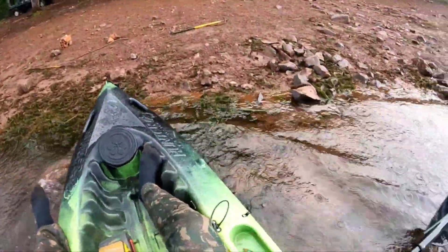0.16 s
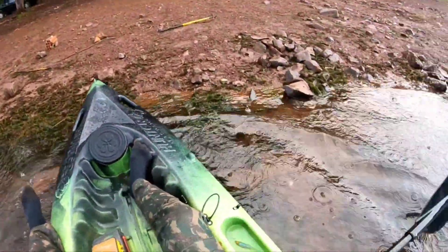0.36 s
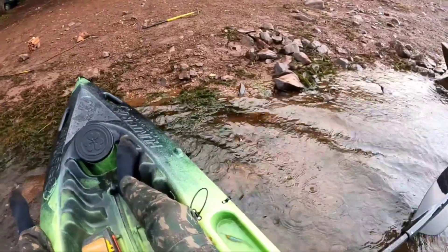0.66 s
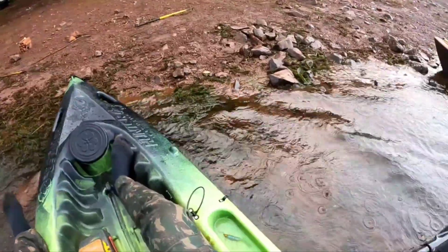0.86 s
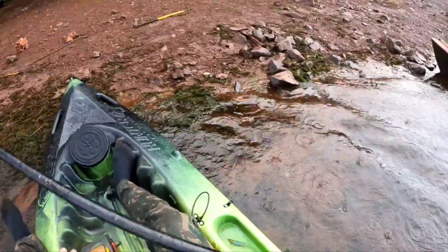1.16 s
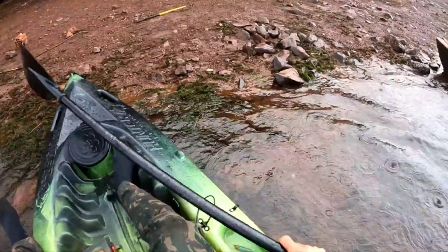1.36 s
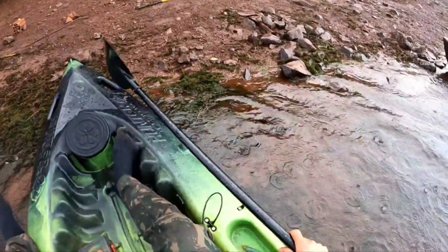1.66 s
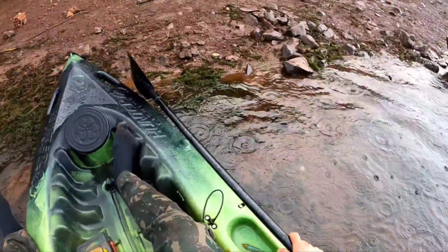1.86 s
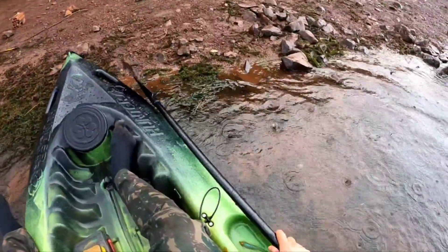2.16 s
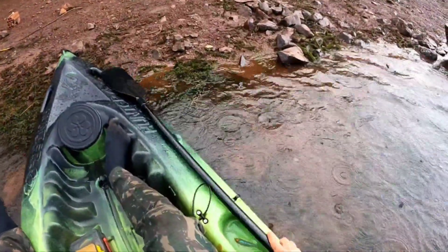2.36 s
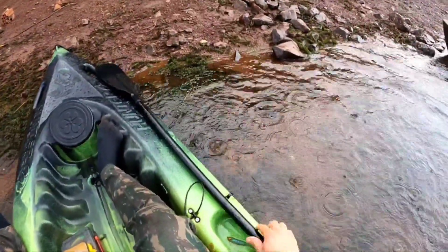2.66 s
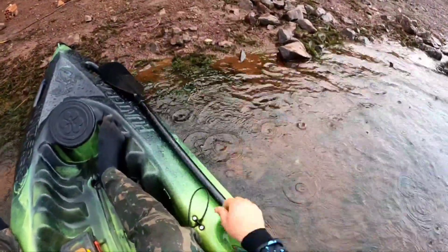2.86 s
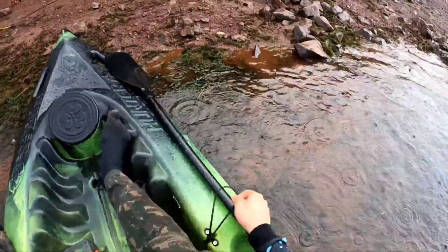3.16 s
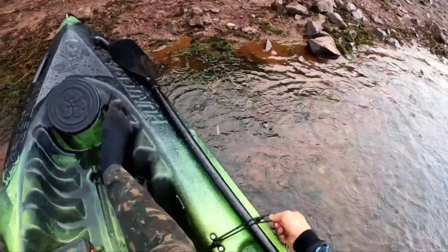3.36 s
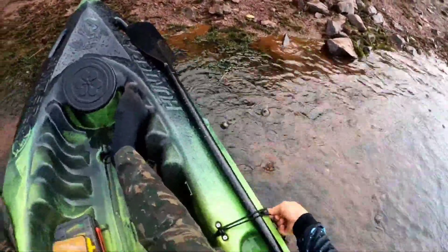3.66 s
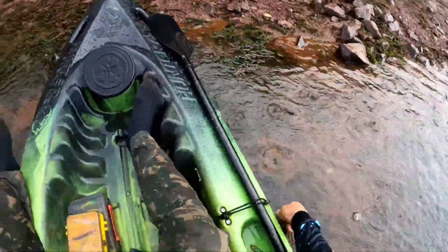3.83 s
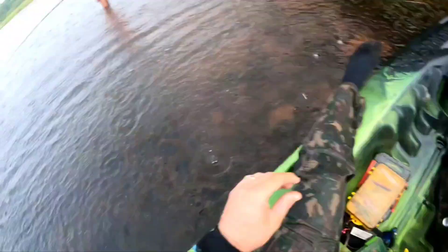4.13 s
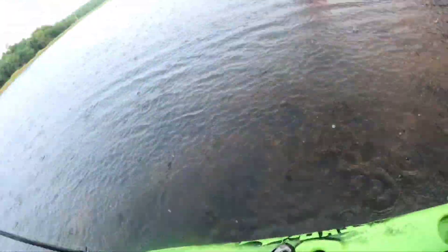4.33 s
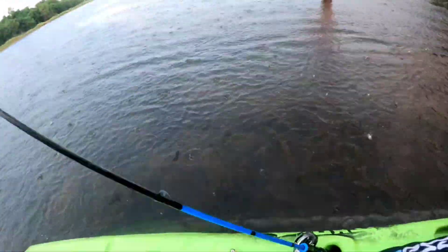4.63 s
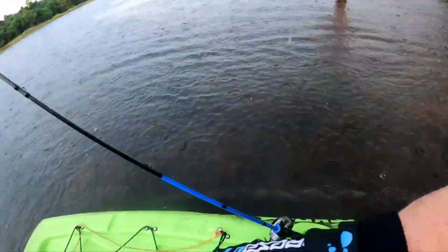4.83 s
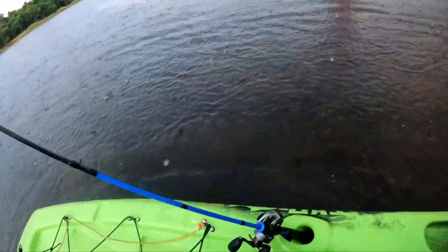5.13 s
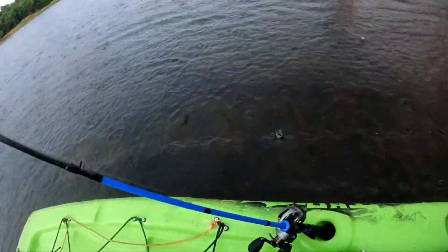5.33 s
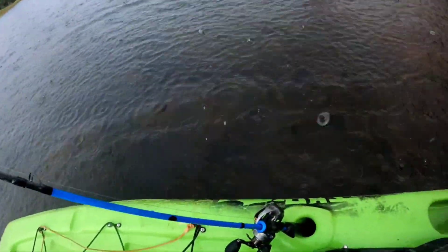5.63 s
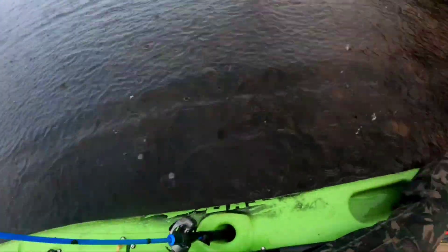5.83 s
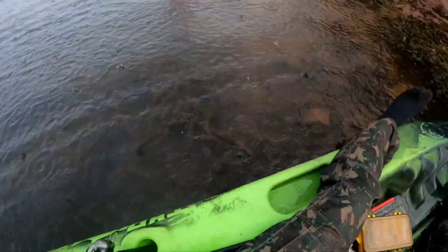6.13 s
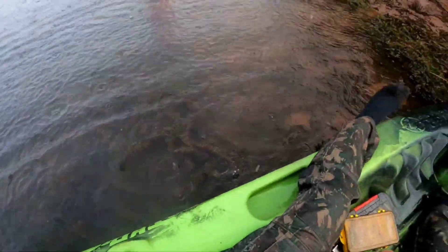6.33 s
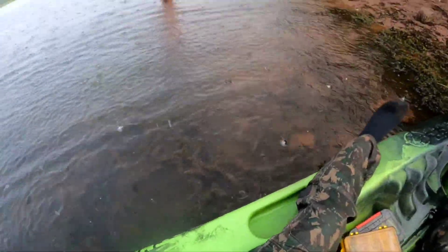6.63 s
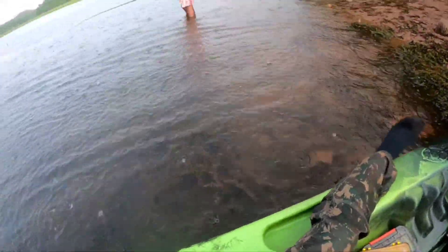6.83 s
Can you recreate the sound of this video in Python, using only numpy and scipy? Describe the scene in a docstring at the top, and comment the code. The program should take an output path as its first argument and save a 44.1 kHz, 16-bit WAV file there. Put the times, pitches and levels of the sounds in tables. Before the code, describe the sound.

Worn microphone, close and outdoors: a plastic kayak grinds and rumbles in short lurches on mud while light rain patters. A paddle taps, then clatters down in a tight cluster of hollow knocks. After a quieter spell a metal hook snaps brightly, water gurgles along the side, a few small knocks follow, and the hull ends with deep dull bumps and scrapes, leaning to the right.

```python
"""At a muddy bank in light rain, someone with a camera strapped to them settles into a plastic kayak.
Slips on mud and gravel excite the hull's modes as decaying sines; a paddle's knocks add cracks and thumps.
A metal hook pings with beating modes; bubbles, gurgles and low bumps of the hull are short, nearly steady
tones, and water swills in crowds of such tones.
Far rain is shaped noise, near drops on water, hull and clothes are short plips and bursts of noise."""
import sys
import numpy as np
from scipy import signal
from scipy.fft import rfft, irfft
from scipy.io import wavfile
from scipy.ndimage import uniform_filter1d

SR = 44100
rng = np.random.default_rng(int(sys.argv[2]) if len(sys.argv) > 2 else 0)


def digitize_waveform(pressure):
    """Quantize a signal to 16-bit integers and store it at the path in sys.argv[1].

    Rows of a 2-D input are taken as channels; values are limited to [-1, 1].
    """
    field = np.atleast_2d(pressure).T
    bounded = np.clip(field, -1, 1)
    quanta = np.round(bounded * 32767).astype(np.int16)
    wavfile.write(sys.argv[1], SR, quanta)


N = 308259

# Blows on the hull: t/s, peak level/dB, thump relative level/dB, thump pitch f/Hz,
# pitch favoured by the spot f/Hz, crack relative level/dB
BLOWS = [(0.633, -20, -15.5, 87.5, 306, -9.5), (0.681, -20.5, 0, 64.6, 301, -8),
         (1.154, -29, -20.5, 199, 433, -5), (1.692, -16.5, -17.5, 75.4, 483, -11.5),
         (2.178, -5, -10, 126, 680, -27), (2.3, -12, -30.5, 110, 655, -23),
         (2.401, -8.5, -7.5, 116, 680, -11.5), (2.461, -13.5, -7, 109, 505, -12.5),
         (2.478, -13.5, -26, 56.5, 504, -14), (2.498, -17.5, -16, 67.3, 415, -11),
         (2.581, -16, 12, 197, 490, 2.5), (2.584, -8.5, 4, 201, 330, -13),
         (2.629, -14.5, -11, 80.7, 345, -14), (2.663, -21.5, 2.5, 170, 1490, -2.5),
         (2.684, -13.5, -2.5, 56.5, 350, -16.5), (3.963, -20, 9.5, 118, 345, -3),
         (5.057, -22, -30, 129, 440, -12), (5.07, -26, -12, 86.1, 680, -29),
         (5.233, -18.5, -8, 56.5, 550, -15), (5.245, -24, 3, 116, 450, -2.5)]
# Modes of the hull, low to high: f/Hz, level/dB, decay time t60/s
HULL_MODES = [(63.5, 9, 0.0855), (83.4, 4, 0.196), (109.5, -2, 0.18), (159.4, 8.5, 0.089),
              (201.7, 3, 0.055), (249.4, 6, 0.06), (288, -4.5, 0.063), (351, 6.5, 0.064), (414, -3.5, 0.11),
              (512, 2.5, 0.07), (568, 6, 0.039), (690, 6.5, 0.038), (781, 3.5, 0.036), (946.7, 2.5, 0.0468),
              (1072, 6.5, 0.0247), (1263, 4.5, 0.01), (1446, -7, 0.035), (1804, 7.5, 0.01226),
              (2410, -3, 0.014)]
# Spectrum of the rain: f/Hz, relative spectral level/dB per Hz
RAIN_SPECTRUM = [(18, -34), (30, -1), (64, 1.5), (131, -8.5), (233, -4), (822, -9), (937, -5),
                 (3980, -13.5), (5040, -14.5), (7470, -18), (8740, -29), (9970, -24.5), (14800, -43),
                 (16000, -35)]

LEFT_RIGHT = np.array([[1], [-1]])  # opposite signs for the two sides


def amp(db):
    """Level definition: a gain is 10 to the power dB/20."""
    return 10 ** (np.asarray(db) / 20)


def evened(x):
    """Power normalisation: scales to rms 1."""
    return x / np.sqrt(np.mean(x ** 2) + 1e-20)


def peaked(x):
    """Peak normalisation: scales to peak 1."""
    return x / (abs(x).max() + 1e-20)


def read(points, hz):
    """Logarithmic interpolation: reads a spectrum on a log-frequency axis."""
    f, value = np.transpose(points)
    return np.interp(np.log(hz + 1), np.log(f + 1), value)


def curves(rows):
    """Linear interpolation in time: one value per sample for each column."""
    s, *columns = np.transpose(rows)
    return [np.interp(np.arange(N) / SR, s, c) for c in columns]


def add(mix, s, sound):
    """Superposition: adds a sound to the mix at time s."""
    part = mix[round(s * SR):][:len(sound)]
    part += sound[:len(part)]


def ring(modes, t, extra_db=0., turns=0., rise_cycles=0.11):
    """Modal synthesis: a sum of exponentially dying sines, each swelling over part of a cycle or more."""
    hz, db, t60 = np.transpose(modes)[:, :, None]
    swell = 1 - np.exp(-t * hz / rise_cycles)
    decay = amp(db + extra_db - 60 * t / t60)
    return (decay * swell * np.sin(2 * np.pi * (hz * t + turns))).sum(0)


def plip(hz, cycles, glide):
    """Damped oscillation: a few cycles that start quickly, rise in pitch as far as the glide says, and die."""
    u = np.arange(0, 4, hz / SR / max(cycles, .5))  # time in units of the given cycles
    envelope = u ** 1.15 * np.exp(-2.5 * u)
    phase = 2 * np.pi * cycles * u * (1 + glide * np.minimum(u, 2))
    return peaked(envelope * np.sin(phase))


def snap(noise, low_hz, high_hz, decay_s):
    """Band-limited impulse noise: an exponentially dying burst, filtered twice to one band."""
    t = np.arange(noise.shape[-1]) / SR
    band = signal.butter(2, [low_hz, high_hz], "band", fs=SR, output="sos")
    return peaked(signal.sosfilt(np.vstack([band, band]), noise * np.exp(-t / decay_s)))


def train(per_s, spread_db):
    """Shot noise: sparse clicks at random times with random sign, a few of them large."""
    place, size, sign = rng.random((int(per_s * N / SR), 3)).T
    size_db = spread_db * np.minimum(-np.log(size + 1e-9), 5)
    return np.bincount((place * N).astype(int), amp(size_db) * np.sign(sign - .5), N)


def steadied(x, span_s, share):
    """Automatic gain control: running power evens out part of the slow level swings, as a steady push does."""
    power = uniform_filter1d(evened(x) ** 2, size=int(span_s * SR))
    return evened(x / (abs(power) + 0.076) ** (share / 2))


def rain():
    """Diffuse field: far drops merge into partly coherent noise with drifting patches and a quick shared flicker."""
    # Likeness of left and right: f/Hz, coherence (1)
    likeness = [(60, 0.59), (180, 0.85), (550, 0.97), (1650, 0.8), (4970, 0.81), (15000, 0.43)]
    frames, hz = N // 128 + 5, np.fft.rfftfreq(512, 1 / SR)
    a, b, c, d, patches = rng.standard_normal((frames, 257, 5)).T
    flicker = evened(uniform_filter1d(patches, 60, axis=0))  # alike over wide bands, new in every frame
    patches = uniform_filter1d(patches, 6, axis=0)
    patches = evened(uniform_filter1d(patches, 20, axis=1))
    same = np.clip(read(likeness, hz), -1, 1)[:, None]
    left, independent = a + 1j * b, c + 1j * d
    z = np.array([left, same * left + np.sqrt(1 - same ** 2) * independent])
    z *= amp(read(RAIN_SPECTRUM, hz)[:, None] + 1.33 * patches + 2.84 * flicker)
    noise = signal.istft(z, nperseg=512, noverlap=384)[1][:, :N]
    return amp(-46) * evened(noise)


def patter(level_db, low_hz, high_hz, per_s, cycles, count=12):
    """Shot noise of near drops: random plips of many sizes, each size with its own level difference between sides."""
    out = np.zeros((2, N))
    for hz, side in zip(np.geomspace(low_hz, high_hz, count), rng.uniform(-0.042, 1, count)):
        drops = signal.oaconvolve(train(per_s / count, 3.28), plip(hz, cycles, 0.079))[:N]
        band_db = read(RAIN_SPECTRUM, hz) + 10 * np.log10(hz)  # bands widen with pitch
        out += drops * amp(band_db + 8.2 * side * LEFT_RIGHT)
    return amp(level_db) * evened(out)


def motion():
    """Addition of powers: shifts that swell, hold and fade, rocking after blows and rest set the grinding's gains."""
    # Shifts of weight: start t/s, hold t/s, rumble level/dB, scrape relative level/dB, favoured pitch f/Hz
    shifts = [(0.0, 0.12, -39.5, -29, 201), (0.208, .11, -35.5, 1.5, 262.6), (0.427, 0.13, -40, 5, 256.4),
              (0.598, 0.15, -31.5, 4.5, 229.5), (0.831, 0.082, -37.5, 3.5, 216.7),
              (1.15, 0.11, -50, 5, 222), (1.411, .16, -47, -10, 306), (1.652, 0.065, -36.5, 1, 255),
              (1.782, 0.076, -43, -18, 170), (2.73, 0.076, -34.5, -27, 160), (2.93, 0.27, -48, -10, 282.6),
              (3.301, 0.039, -43.5, 3, 247), (3.44, 0.13, -47.5, -8, 230), (3.877, 0.064, -44, 5, 175),
              (4.03, 0.094, -48.5, 0, 162), (4.32, 0.11, -60, 13.5, 424), (4.595, 0.27, -46, -4.5, 267),
              (4.896, 0.216, -32, -9.5, 214), (5.246, 0.027, -28.5, -13, 165), (5.58, 0.021, -37, -8, 165),
              (5.783, 0.034, -40.5, -2, 212), (5.9, 0.117, -37.5, -15, 160), (6.098, 0.13, -23.5, -7, 168),
              (6.51, 0.22, -30.5, -10.5, 165), (6.821, 0.036, -27.5, -5.5, 155.3),
              (6.96, .04, -36, -22, 160)]
    rise_db_per_s, fall_db_per_s = 267, 198
    still_db, still_hz = -62.5, 290  # the hull at rest
    after_db, after_scrape_db, after_hz, after_fall_db_per_s = -14, -4.5, 214, 161  # rocking left by a blow
    t = np.arange(0, N + 64, 64) / SR
    s, hold, db, scrape_db, hz = np.transpose(shifts)[:, :, None]
    shift_db = db - rise_db_per_s * np.maximum(s - t, 0) - fall_db_per_s * np.maximum(t - s - hold, 0)
    s, db, thump_db = np.transpose(BLOWS)[:3, :, None]
    rocking_db = db + np.maximum(thump_db, 0) + after_db - after_fall_db_per_s * abs(t - s)
    shift = amp(shift_db) ** 2
    after = (amp(rocking_db) ** 2 * (t > s + .012)).sum(0)
    still = amp(still_db) ** 2
    scraped, shaken = shift * amp(scrape_db) ** 2, after * amp(after_scrape_db) ** 2
    scrape = scraped.sum(0) + shaken + still
    # the pitch is the mean of all pitches, weighted by power
    pitch = ((scraped * hz).sum(0) + shaken * after_hz + still * still_hz) / scrape
    gains = np.sqrt(shift.sum(0) + after + still), np.sqrt(scrape), pitch
    return [np.interp(np.arange(N) / SR, t, uniform_filter1d(g, size=9)) for g in gains]


def grind():
    """Stick-slip excitation: slow lurches on mud and gravel ring low hull modes, quick slips higher ones and slosh."""
    rumble_gain, scrape_gain, favoured_hz = motion()
    t = np.arange(SR // 4) / SR
    sway_band = signal.butter(2, [28, 60], "band", fs=SR, output="sos")
    sway = signal.sosfilt(sway_band, train(300, 3.3))
    # the slope in dB/s damps the modes beyond their own decay
    lurch = signal.oaconvolve(train(90, 4.2), ring(HULL_MODES[:3], t, -120 * t, rise_cycles=0.38))[:N]
    slips, scrape = train(420, 3.0), 0
    for mode in HULL_MODES[3:10]:  # the contact wanders along the hull and favours the modes near it
        share = amp(-18.0 * np.log2(mode[0] / favoured_hz) ** 2)
        rung = signal.oaconvolve(slips, ring([mode], t, -90 * t, rise_cycles=0.39))[:N]
        scrape += share * evened(rung)
    # water along the side
    slosh = signal.oaconvolve(train(450, 3.0), ring(HULL_MODES[9:17], t, -300 * t))[:N]
    slosh_gain = amp(-14 + 7.0 * np.log2(favoured_hz / 250))
    low = steadied(evened(lurch) + .5 * evened(sway), 0.0775, 0.36)
    high = steadied(scrape, 0.086, 0.23) + slosh_gain * steadied(slosh, 0.092, 0.057)
    return rumble_gain * low + scrape_gain * high


def taps():
    """Impact and resonance: a pitched plip with a noisy click; the finest spray reaches each port differently."""
    # Big drops and small taps nearby: t/s, peak level/dB, pitch f/Hz, click relative level/dB,
    # spray relative level/dB
    tap_rows = [(0.095, -36, 500, -26, -29), (0.432, -42, 1050, 12, 6), (0.454, -24, 1600, -18, -27.5),
                (0.495, -36.5, 852, 11.5, -20), (0.576, -32, 540, 0.5, -15), (1.095, -38.5, 1020, 10, -20),
                (1.428, -30, 2300, 2, -5), (1.524, -35, 681, 2.5, -7), (2.125, -35, 900, 3, -5),
                (1.157, -42, 2000, 0, 7.5), (2.164, -28, 790, 3, -9.5), (2.525, -41, 2000, -6, 8),
                (2.589, -30.5, 2000, -6, 3), (2.729, -46, 760, -14, 13), (2.765, -40.5, 1030, 9.5, 5),
                (2.81, -29, 1363, -46, -60), (3.016, -28.5, 790, -5, -9), (3.18, -26, 814, -0.5, -9),
                (3.3, -29.5, 1396, -2, -12.5), (3.708, -47, 1240, 19.5, 9), (3.751, -34, 1065, 4.5, -9.5),
                (4.183, -36.5, 690, 12.5, 7), (4.308, -25.5, 2750, 3, -12), (4.698, -34, 511, -20, -22),
                (4.814, -23.5, 870, -35, -37), (4.933, -33, 950, 3.5, -22), (4.993, -33, 620, -21, -26),
                (5.163, -30.5, 530, -33, -26), (5.601, -34.5, 555, 8, -25), (5.751, -33.5, 880, 3, -4),
                (5.818, -33, 2210, 1, -4), (5.834, -32.5, 1140, -5.5, -10.5), (6.065, -32, 485, -1, -23),
                (6.472, -23, 734, 2, -4), (6.487, -28.5, 571, -15, -31), (6.804, -21, 609, -0.5, -19),
                (6.876, -33.5, 516, 1, -24)]
    out = np.zeros((2, N))
    for s, db, hz, click_db, spray_db in tap_rows:
        splash, click, *spray = rng.standard_normal((4, 600))
        rough = amp(2.0) * snap(splash, 0.94 * hz, 2.13 * hz, 0.003)
        rough += amp(click_db) * snap(click, 1002, 5980, 0.0022)
        for port, fine in zip(out, spray):
            add(port, s, amp(db) * plip(hz, 2.97, 0.0022))
            add(port, s, amp(db) * (rough + amp(spray_db) * snap(fine, 5500, 10960, 0.0017)))
    return out


def bubbles_and_bumps():
    """Damped resonance: short, nearly steady decaying tones, with more cycles at higher pitch."""
    # Bubbles, gurgles and low bumps of the hull: t/s, peak level/dB, pitch f/Hz
    tone_rows = [(.318, -32.5, 566.5), (0.577, -36.5, 1250), (0.692, -32.5, 1219), (1.348, -34, 257),
                 (3.615, -38, 922), (1.064, -42, 974), (4.316, -37, 1335), (6.102, -19, 162),
                 (6.135, -14, 156.6), (6.211, -22.5, 139), (6.241, -25, 145), (6.383, -28, 114),
                 (6.816, -23.5, 96), (6.874, -21, 87.8)]
    cycles_at_500_hz, cycles_slope, glide = 7.1, 0.86, .003
    out = np.zeros(N)
    for s, db, hz in tone_rows:
        cycles = cycles_at_500_hz * (hz / 500) ** cycles_slope
        add(out, s, amp(db) * plip(hz, cycles, glide))
    return out


def swill(count=12):
    """Superposed bubble resonances: crowds of small bubbles swell and fade with every wash of water."""
    # Water swilling along the hull: start t/s, hold t/s, level/dB, favoured pitch f/Hz
    washes = [(0.576, 0.165, -46.5, 1057), (4.355, 0.086, -40, 577), (4.93, 0.055, -39, 1090),
              (5.232, 0.063, -43, 800), (6.052, 0.065, -51, 480), (6.55, 0.28, -53.5, 550)]
    low_hz, high_hz, bubbles_per_s = 418.8, 1690, 900
    fade_db_per_s, fall_db_per_octave = 150, 10.5
    t, out = np.arange(0, N + 64, 64) / SR, np.zeros(N)
    s, hold, db, favoured_hz = np.transpose(washes)[:, :, None]
    wash_db = db - fade_db_per_s * np.maximum(np.maximum(s - t, t - s - hold), 0)
    for hz in np.geomspace(low_hz, high_hz, count):
        off_pitch_db = fall_db_per_octave * abs(np.log2(hz / favoured_hz))
        gain = amp(wash_db - off_pitch_db).sum(0) / np.sqrt(count)
        crowd = signal.oaconvolve(train(bubbles_per_s / count, 2.5), plip(hz, 7.1, 0.018))[:N]
        out += np.interp(np.arange(N) / SR, t, gain) * evened(crowd)
    return out


def knocks():
    """Modal excitation by impact: a crack and bright rattle, hull modes near the spot swelling in, the bass last."""
    out, t, hz = np.zeros(N), np.arange(SR // 4) / SR, np.transpose(HULL_MODES)[0][:, None]
    for s, db, thump_db, thump_hz, spot_hz, crack_db in BLOWS:
        spot, turns = rng.standard_normal((2, len(HULL_MODES), 1))
        weight_db = 2.0 * spot - 4.04 * abs(np.log2(hz / spot_hz))
        body = ring(HULL_MODES[4:], t, weight_db[4:], 0.2 * turns[4:], 1.8)
        thump_weight_db = -14.0 * abs(np.log2(hz[:5] / thump_hz))
        thump = ring(HULL_MODES[:5], t, thump_weight_db, 0., 0.38) * (1.0 + np.exp(-t / 0.035))
        crack = snap(rng.standard_normal(800), 740, 5550, 0.00178)
        rattle = snap(rng.standard_normal(3000), 3800, 5250, 0.012)
        add(out, s + 0.001377, amp(db) * peaked(body))
        add(out, s + 0.00592, amp(db + thump_db) * peaked(thump))
        add(out, s, amp(db + crack_db) * crack)
        add(out, s + 0.003, amp(db - 30) * rattle)
    return out


def pings():
    """Beats: the hook snaps against metal and its closely spaced modes beat as they die."""
    # Strokes of the metal hook: t/s, peak level/dB, top modes relative level/dB
    strokes = [(1.361, -40.5, -4), (3.469, -29.5, -32), (3.9676, -6, -23)]
    # Main modes of the hook: f/Hz, level/dB, decay time t60/s
    hook_modes = [(4036.6, -7.5, 0.091), (4070, -21, 0.15), (4218, -10, 0.0276)]
    # Top modes of the hook: f/Hz, level/dB, decay time t60/s
    top_modes = [(11000, -8, .05), (11760, 8, 0.027), (12000, -13, .04)]
    out, t = np.zeros(N), np.arange(SR // 5) / SR
    for s, db, top_db in strokes:
        tone = peaked(ring(hook_modes, t)) + amp(top_db) * peaked(ring(top_modes, t))
        add(out, s, amp(db) * tone)
        add(out, s, amp(db - 15.5) * snap(rng.standard_normal(400), 2400, 10000, 0.0021))
    return out


def scene():
    """Level-difference panning: grinding, bubbles, bumps and swill shift as the camera turns; the rest stays put."""
    # Turning of the camera: t/s, left minus right level/dB
    turning = [(0.0, -1), (5.14, 0.5), (5.68, -4), (6.05, -5.5), (6.99, -6)]
    # Strength of the rain, relative to its mean over time: t/s, level/dB
    shower = [(0.0, -54), (0.41, -52.5), (0.6, -51.5), (1.4, -49.5), (6.99, -49)]
    facing = amp(curves(turning)[0] / 2 * LEFT_RIGHT)
    shower_db = curves(shower)[0]
    weather = rain()
    weather += patter(-52.0, 318, 3204, 150, 3.64)
    weather += patter(-55, 1910, 11420, 400, 1.71)
    weather += patter(-62, 3540, 13000, 60, 0.8)
    weather *= amp(shower_db - shower_db.mean())
    turned = (grind() + bubbles_and_bumps() + swill()) * facing
    return turned + knocks() + taps() + pings() + weather


def record(dry):
    """Linear filtering: the two ports differ in level and phase, deep bass is cut, then the treble above 16 kHz."""
    # Level difference of the ports: f/Hz, left minus right level/dB
    port_levels = [(60, -1), (150, 1), (380, -1), (950, -0.5), (2380, -1), (5980, -1.5), (15000, 3)]
    # Phase lead of the left port: f/Hz, phase/rad
    port_lead = [(100, 0.023), (1200, -0.26), (3200, -0.63), (5000, -0.46)]
    hz, side = np.fft.rfftfreq(N, 1 / SR), LEFT_RIGHT / 2
    ports = amp(read(port_levels, hz) * side) * np.exp(1j * read(port_lead, hz) * side)
    bass_cut = np.sqrt(1 + (35 / (hz + 1)) ** 4)
    heard = irfft(rfft(dry) * ports / bass_cut, N)
    band_limit = signal.firwin(511, 16000, window=("kaiser", 9), fs=SR)
    return signal.oaconvolve(heard, band_limit[None], "same")


dry = scene()
out = record(dry)
digitize_waveform(out)
```